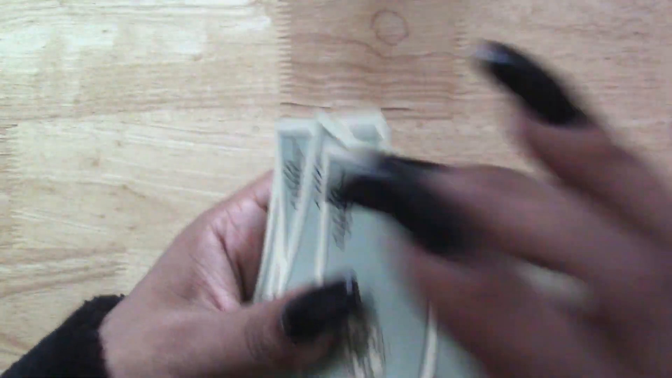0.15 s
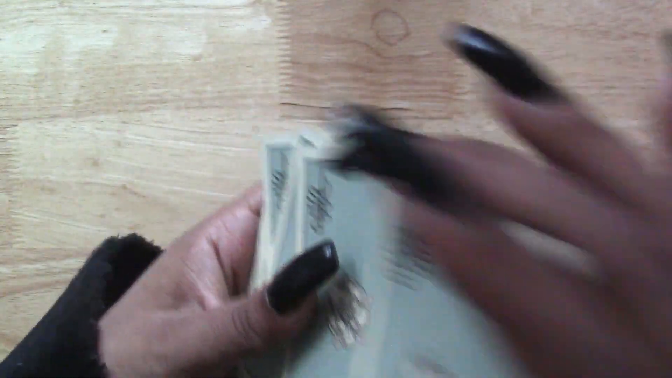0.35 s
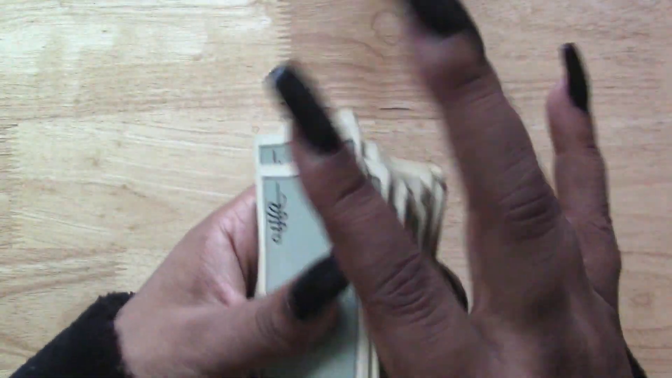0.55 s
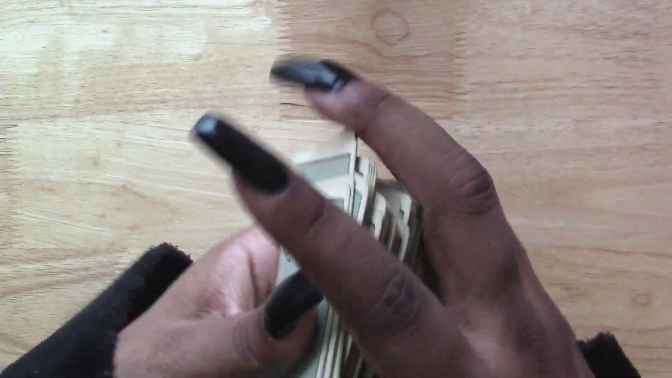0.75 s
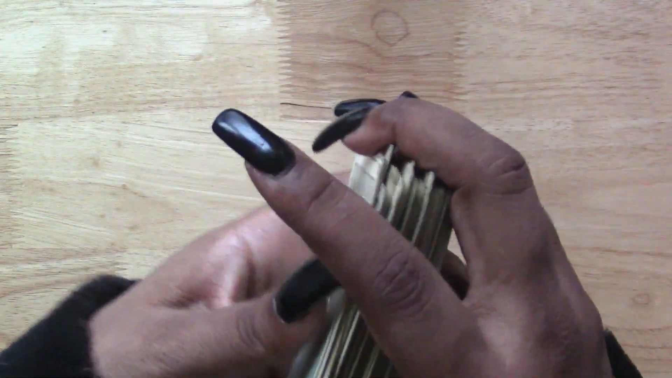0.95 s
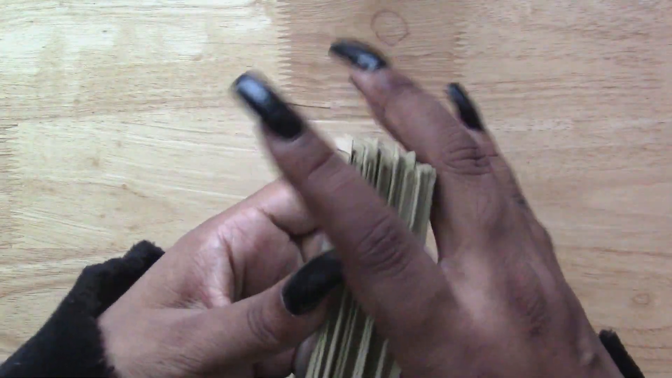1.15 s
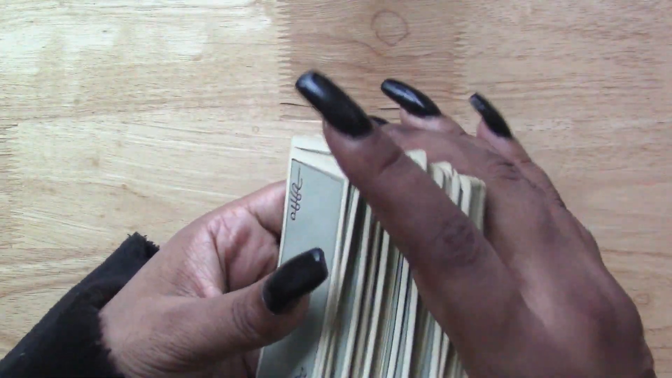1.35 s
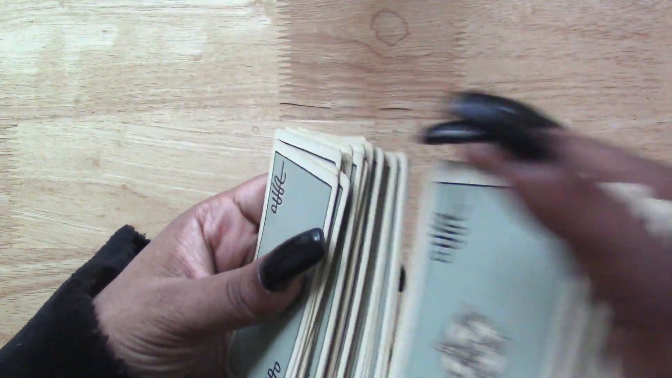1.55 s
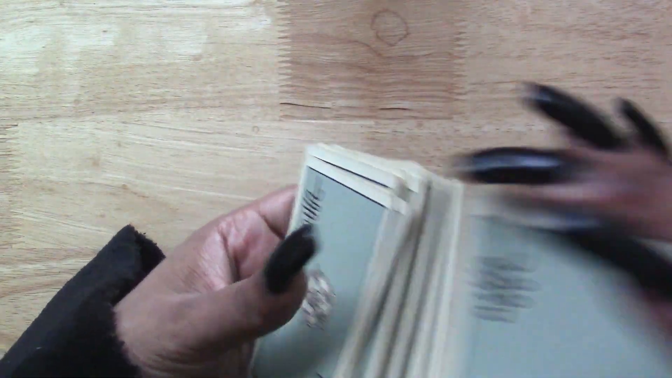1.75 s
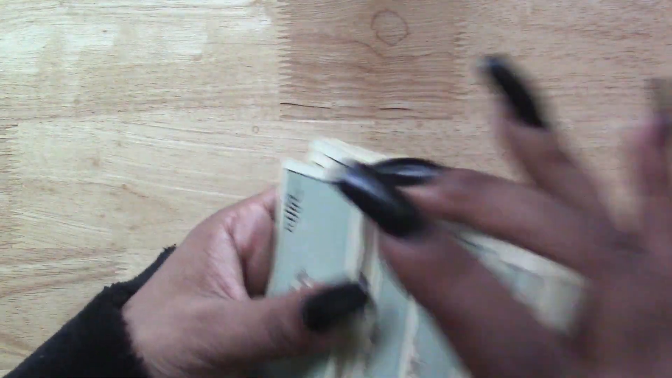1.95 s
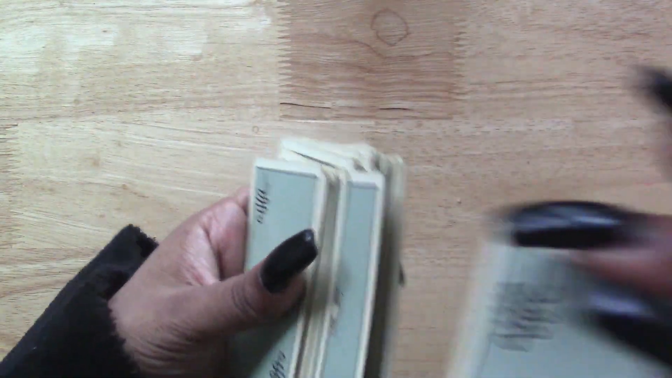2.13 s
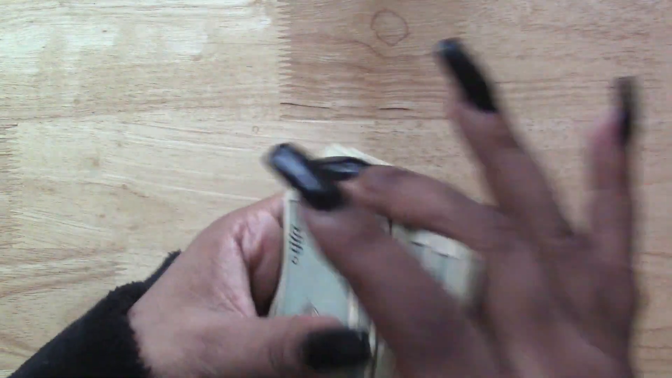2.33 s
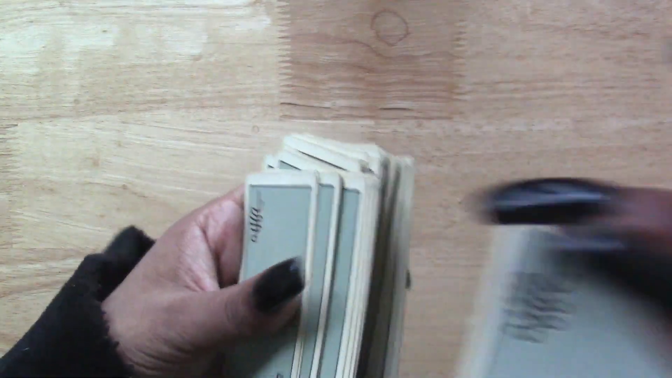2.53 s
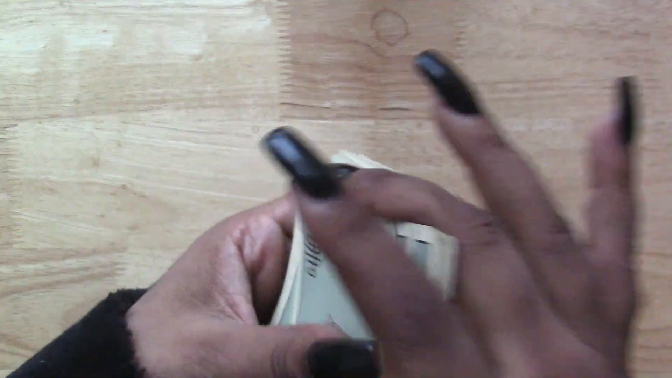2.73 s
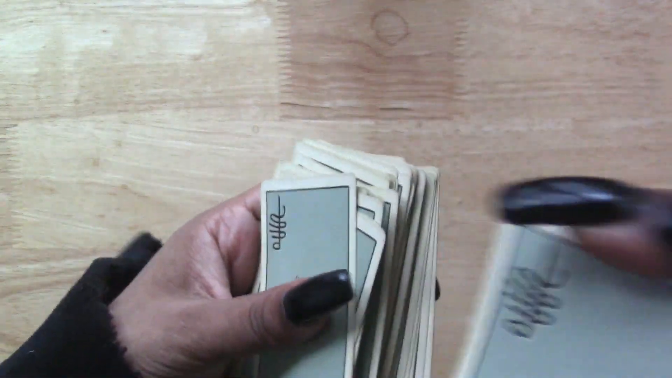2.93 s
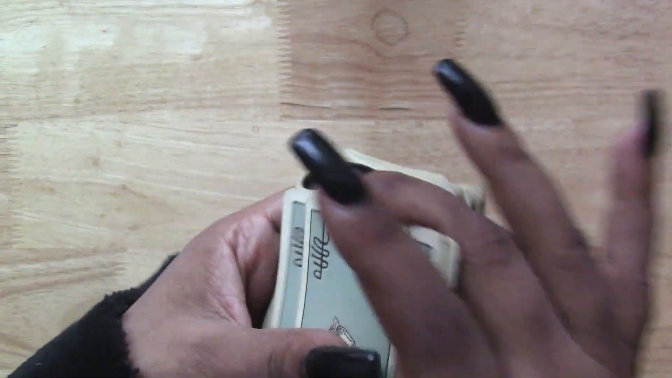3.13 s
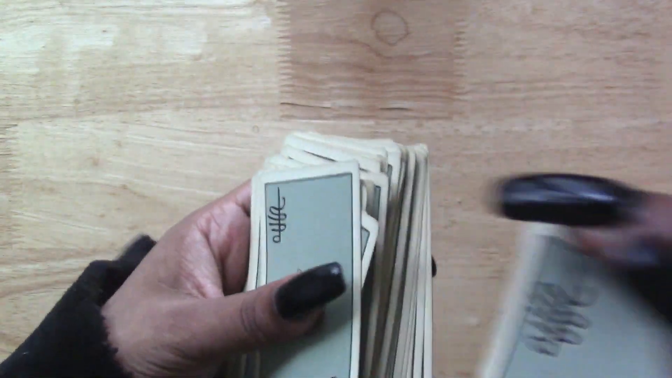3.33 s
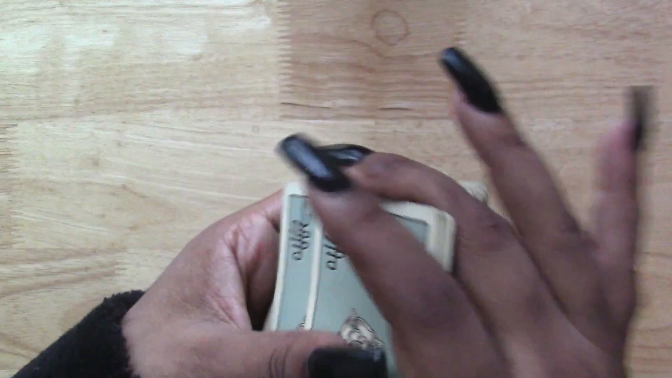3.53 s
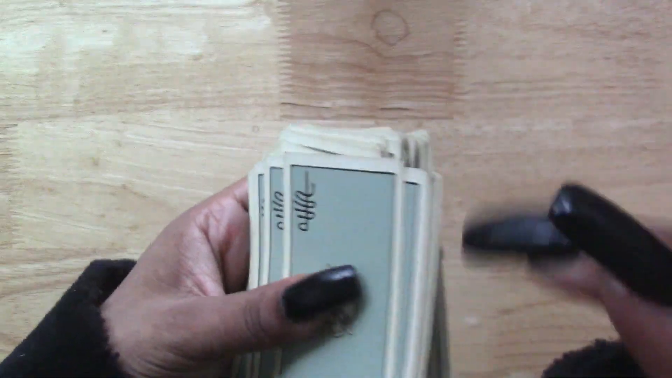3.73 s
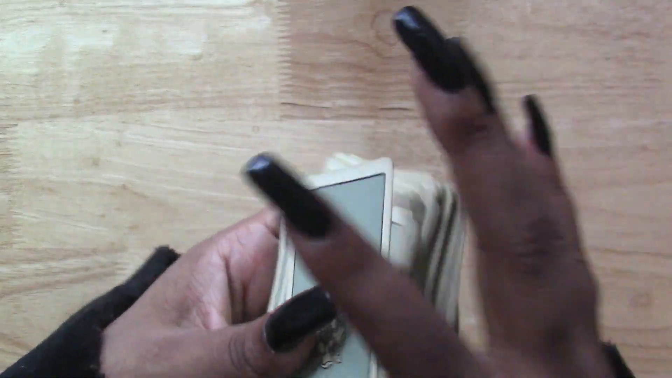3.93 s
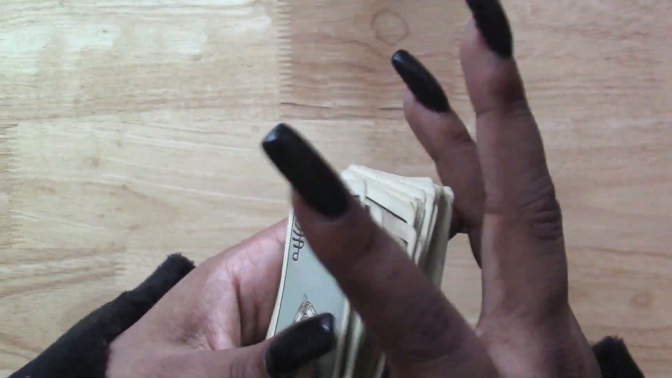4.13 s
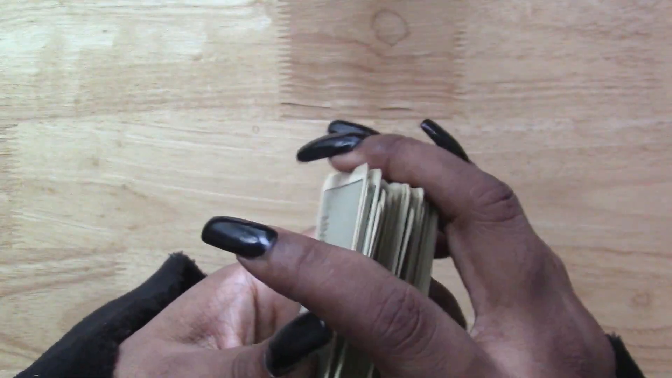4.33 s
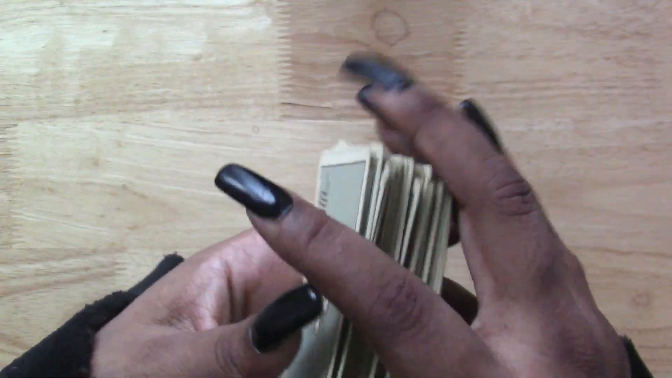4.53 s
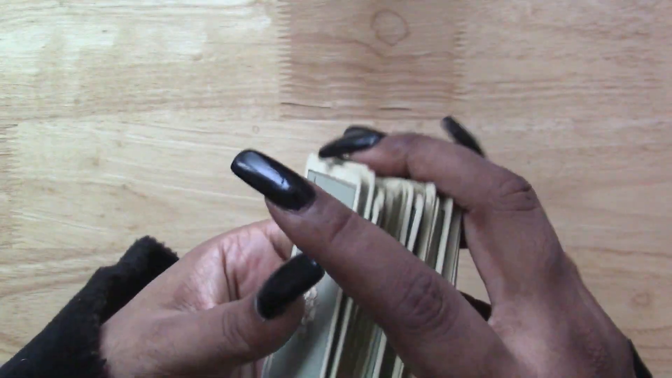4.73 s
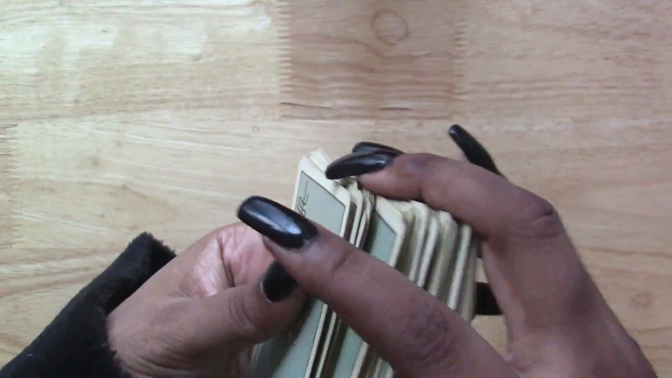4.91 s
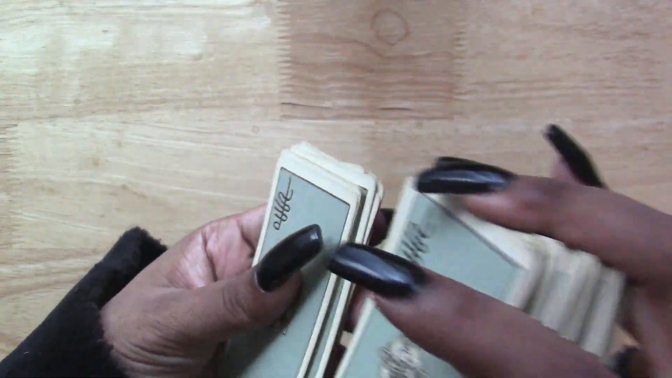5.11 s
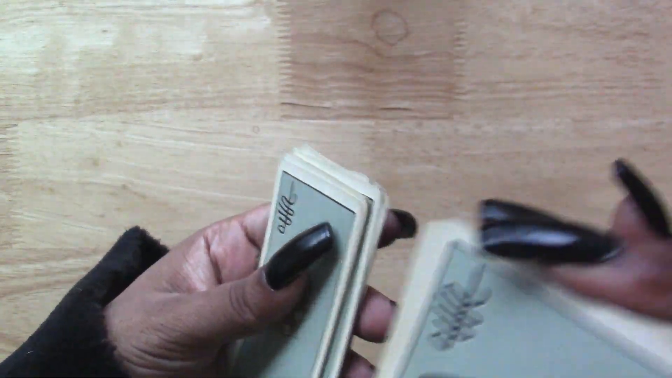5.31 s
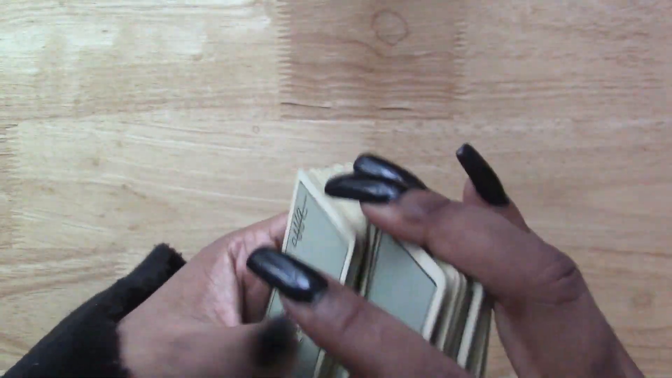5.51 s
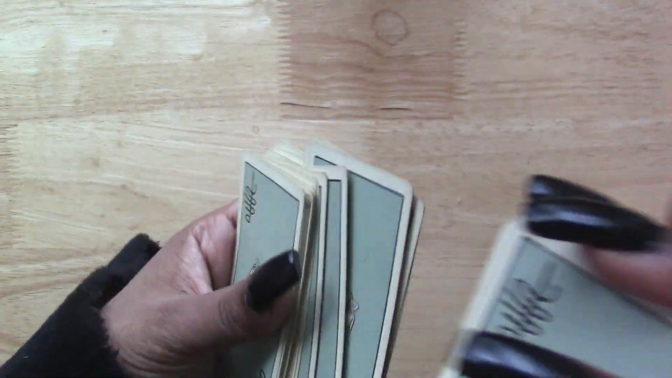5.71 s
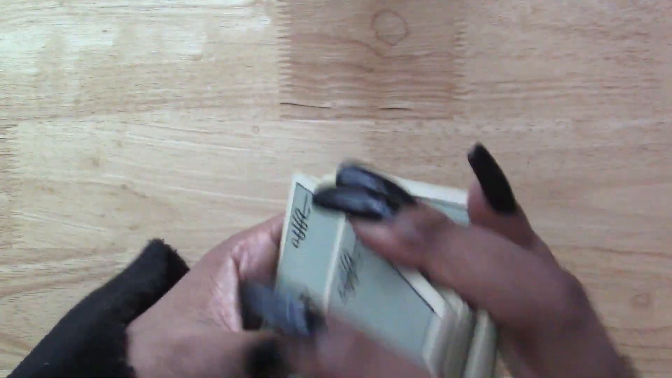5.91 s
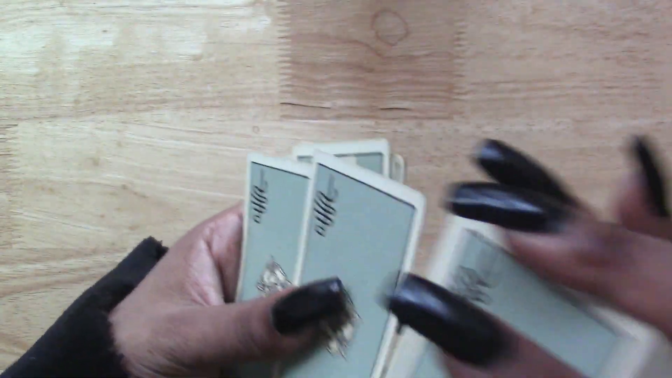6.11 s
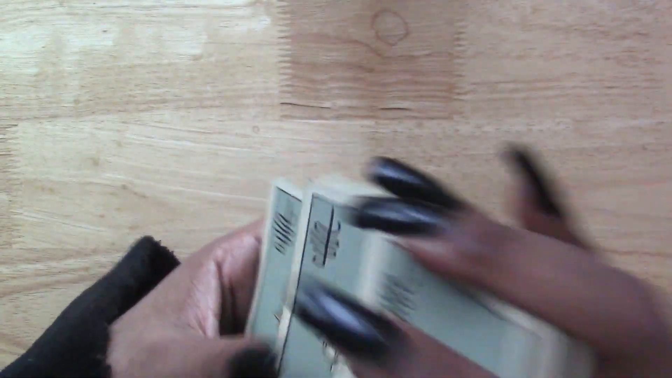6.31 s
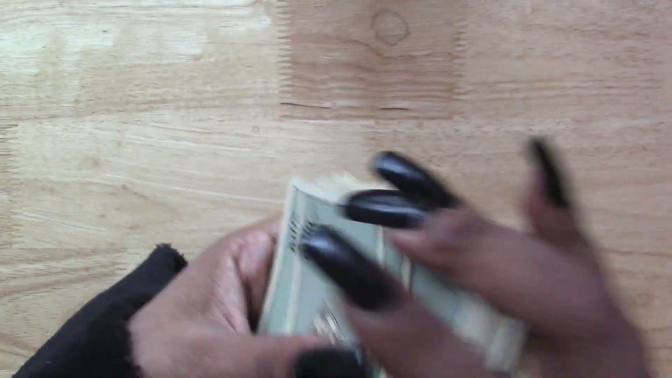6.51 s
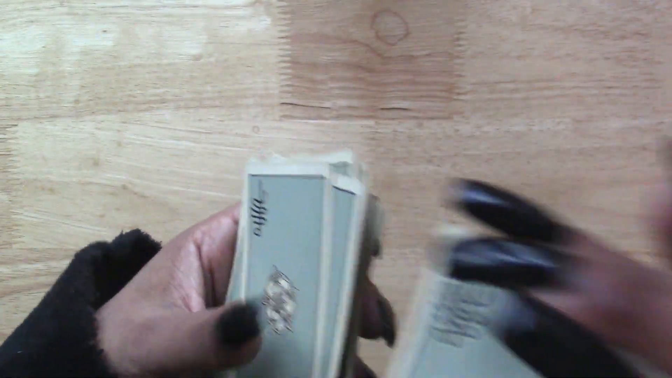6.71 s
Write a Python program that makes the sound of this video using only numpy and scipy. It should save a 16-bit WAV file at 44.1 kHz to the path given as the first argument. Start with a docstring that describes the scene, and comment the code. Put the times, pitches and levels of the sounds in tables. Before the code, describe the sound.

A deck of stiff cards is shuffled overhand close to the microphone, with papery hisses, crisp snaps, ticks and soft palm thuds in a quiet room.

```python
"""A soft bed of room air, then at once a papery rub, a clap and a burst of card ticks: a tarot deck is shuffled
overhand, close to the microphone, in a small quiet room. Each packet slides along the deck with a swelling
hiss and lands in a cluster of snaps and soft thuds; further claps, snaps and ticks fall in and between.
Filtered noise makes the air and the hiss; impulses ringing through resonators make snaps, knocks, thuds
and rasps."""
import sys
import numpy as np
from scipy import signal
from scipy.io import wavfile

SR = 44100
rng = np.random.default_rng(int(sys.argv[2]) if len(sys.argv) > 2 else 0)


def persist_wave(psi):
    """Save psi, clipped to +-1, as 16-bit WAV."""
    counts = np.round(np.clip(psi, -1, 1) * 32767).astype(np.int16)
    wavfile.write(sys.argv[1], SR, np.atleast_2d(counts).T)


N = 302526   # length in samples


def from_db(db):
    """Decibels to gain."""
    return 10 ** (np.asarray(db) / 20)


def rms_one(x):
    """Scale to unit power."""
    return x / np.sqrt(np.mean(x ** 2) + 1e-20)


def at_hz(points, hz):
    """Read a spectrum on a log-frequency axis."""
    points = np.array(points)
    return np.interp(np.log(hz), np.log(points[:, 0]), points[:, 1])


def cut(x, hz, kind, order=2):
    """Butterworth filter."""
    sos = signal.butter(order, np.clip(hz, 10, 0.45 * SR), kind, fs=SR, output="sos")
    return signal.sosfilt(sos, x)


def resonate(x, hz, width_hz):
    """A two-pole resonance with gain one at its top."""
    r = np.exp(-np.pi * width_hz / SR)
    zeros = np.array([1, 0, -1]) * (1 - r * r) / 2
    poles = [1, -2 * r * np.cos(2 * np.pi * hz / SR), r * r]
    return signal.lfilter(zeros, poles, x)


def flutter(per_s):
    """Random wandering with unit power, from per_s new values each second."""
    knots = rng.standard_normal(N // 8)
    return rms_one(np.interp(np.arange(N) * per_s / SR, np.arange(len(knots)), knots))


def bands(sources):
    """Third-octave bands (centre Hz, share of the spectrum, signal), neighbours fed by different sources."""
    edges = 16000 / 2 ** (np.arange(28, -1, -1) / 3)
    for k, (low, high) in enumerate(zip(edges, edges[1:])):
        band = cut(sources[k % 2], [low, high], "band", order=3)
        yield np.sqrt(low * high), 2 * (high - low) / SR, band


def with_energy(x, level_db):
    """Give a short sound the energy of 5 ms at that level."""
    return x * from_db(level_db) * np.sqrt(0.005 * SR / (np.sum(x ** 2) + 1e-20))


def stereo(mid, side, side_db):
    """Left and right from a shared and an opposed part."""
    return mid + from_db(side_db) * side * np.array([[1], [-1]])


def bump(t, middle_s, half_s):
    """A smooth bell-shaped rise and fall."""
    return np.exp(-0.5 * ((t - middle_s) / half_s) ** 2)


def rise_and_fade(t, peak_s, peak_db, rise_db_per_s, fade_db_per_s):
    """A gain that climbs to its peak and falls away, both straight lines in dB."""
    return from_db(peak_db - np.maximum((peak_s - t) * rise_db_per_s, (t - peak_s) * fade_db_per_s))


# colour of the room air: f/Hz, relative level per Hz/dB
AIR_COLOUR = [(25, -18), (45, -12), (80, -10.5), (125, 0), (240, 1.5), (350, -1.5), (500, -3), (800, -6.5),
              (1300, -7), (2100, -15.5), (3100, -15.5), (4500, -19.5), (6200, -22.5), (7500, -28),
              (12000, -32), (15000, -28)]
# stereo width of the room air: f/Hz, side minus mid level/dB
AIR_WIDTH = [(50, -4), (130, -8), (700, -4.5), (3000, -8), (12000, -15)]
# faint resonances in the room air, from narrow whirs to a broad hiss: f/Hz, width/Hz, level/dB
AIR_RESONANCES = [(1285, 9.7, -71.5), (3076, 78, -71.5), (5550, 83, -78.5), (6400, 1100, -72.5)]


def room_tone(air_db=-56.5):
    """Steady soft air noise, shaped band by band, with a few faint resonances of filtered noise."""
    air = 0
    for hz, _, (mid, side) in bands(rng.standard_normal((2, 2, N))):
        air = air + from_db(at_hz(AIR_COLOUR, hz)) * stereo(mid, side, at_hz(AIR_WIDTH, hz))
    resonances = sum(from_db(db) * rms_one(resonate(rng.standard_normal(N), hz, width))
                     for hz, width, db in AIR_RESONANCES)
    return from_db(air_db) * rms_one(air) + resonances


# colour of card rubbing on card: f/Hz, relative level per Hz/dB
RUB_COLOUR = [(100, -24), (250, -0.5), (650, -7.5), (850, -6), (1300, 0), (1650, -0.5), (2200, -3),
              (3300, 0.5), (4300, -4), (5400, -4.5), (6700, -9.5), (8800, -5), (11500, -9.5),
              (14500, -16.5)]


def sliding(friction_db, bright_db, catches_per_s=700, catch_db=-4, size_db=4, judder_db=2.5,
            judder_per_s=170, patchy_db=2.5, patchy_per_s=45, tilt_from_hz=1200, trim_db=-1.5):
    """Paper fibres hiss and catch; the stroke judders, and the colour shifts as the overlap changes."""
    sizes = from_db(size_db * np.minimum(rng.exponential(1, N), 4)) * rng.choice([-1, 1], N)
    catches = rms_one(sizes * (rng.random(N) < catches_per_s / SR))
    fibres = rms_one(rng.standard_normal((2, N)) + from_db(catch_db) * catches)
    hiss, power = 0, 0
    for hz, share, band in bands(fibres):
        if hz > RUB_COLOUR[0][0] / 2:
            tilt_db = bright_db * np.log2(max(hz / tilt_from_hz, 1))
            gain = from_db(at_hz(RUB_COLOUR, hz) + tilt_db)
            hiss = hiss + band * gain * from_db(patchy_db * flutter(patchy_per_s))
            power = power + share * gain ** 2
    return hiss / np.sqrt(power) * from_db(trim_db + friction_db + judder_db * flutter(judder_per_s))


# short rubs of card on card, some beside a snap or slap, levels before the trim:
# middle t/s, half length/s, friction level/dB, brightness/dB per octave
SHORT_RUBS = [(0.016, 0.0073, -46, 3), (0.093, 0.018, -44.5, -3), (0.502, 0.0058, -48.5, 3),
              (0.573, 0.014, -57.5, 3), (0.777, 0.016, -53, 2), (0.86, 0.021, -44, 5),
              (0.962, 0.017, -50, 2), (1.13, 0.044, -54, 2.5), (1.273, 0.033, -52.5, 1),
              (1.353, 0.06, -56.5, 1.5), (1.594, 0.019, -45.5, -3), (1.976, .012, -46.5, 0.5),
              (2.029, 0.01, -39.5, -0.5), (2.452, 0.0056, -35.5, 0), (4.012, 0.031, -45.5, 2),
              (4.148, 0.027, -60, 5), (4.337, 0.027, -47.5, 5.5), (4.395, 0.019, -52.5, 2.5),
              (5.035, 0.029, -59.5, -0.5), (5.117, 0.032, -51, -2), (5.559, 0.011, -39, -2),
              (5.649, 0.014, -37.5, -.5), (5.896, 0.015, -61.5, -1), (6.084, 0.01, -41, 0),
              (6.327, 0.0038, -47.5, 4), (6.616, 0.0064, -28.5, 1.5), (6.633, 0.026, -39.5, -3)]


def short_rubs(t):
    """Short rubs of card on card swell and fade smoothly: (gain, brightness) pairs."""
    return [(from_db(db) * bump(t, s, half), bright) for s, half, db, bright in SHORT_RUBS]


# what a struck card rings with, before random detuning: f/Hz, width/Hz, relative level/dB
CARD_MODES = [(1210, 320, -0.5), (1980, 1610, -2), (3316, 640, 5), (4980, 650, 1.5), (8080, 840, -6.5),
              (10300, 3000, -11)]


def contacts(rows, edge_share=0.38, edges_per_s=7000, detune=0.079, crack_trim_db=-14, crack_hz=4000,
             knock_width_hz=240, thud_hz=145, thud_width_hz=90, thud_db_per_octave=42, snap_trim_db=-1.68,
             thud_trim_db=-1, card_low_hz=850, knock_top_hz=800, thud_top_hz=280, size=4096):
    """One edge hits first, its neighbours patter after it; the packet knocks the deck and thuds in the palm."""
    out, t = np.zeros(N + size), np.arange(size) / SR
    for s, snap_db, bright_db, deck_db, knock_hz, palm_db, scatter_s in rows:
        edges = edge_share * rng.standard_normal(size) * (rng.random(size) < edges_per_s / SR) * 2
        edges *= np.exp(-t / max(scatter_s, 1e-4))
        edges[0] = 1

        # each contact shifts the ring pitches a little at random
        shift = np.exp(detune * rng.standard_normal(len(CARD_MODES)))
        tilt_db = np.clip(bright_db, -7, 7)
        ring = 0
        for k, (hz, width, db) in enumerate(CARD_MODES):
            mode_gain = from_db(db + tilt_db * np.log2(hz / CARD_MODES[2][0]))
            ring = ring + (-1) ** k * mode_gain * resonate(edges, hz * shift[k], width)
        snap = with_energy(cut(ring, card_low_hz, "high"), snap_db + snap_trim_db)
        # the bare impacts sound above the ring
        crack = with_energy(cut(edges, crack_hz, "high"), snap_db + crack_trim_db)

        knock = resonate(edges, knock_hz, knock_width_hz)
        knock = with_energy(cut(knock, knock_top_hz, "low"), deck_db)
        # the weaker the snap beside the thud, the deeper the thud
        palm_hz = thud_hz * 2 ** ((snap_db - palm_db) / thud_db_per_octave)
        thud = resonate(t == 0, palm_hz, thud_width_hz)
        thud = with_energy(cut(thud, thud_top_hz, "low"), palm_db + thud_trim_db)

        start = max(round(s * SR), 0)
        out[start:start + size] += snap + crack + knock + thud
    return out[:N]


TIGHT_KNOCK_HZ = 523   # pitch of the deck while it is held tight
# a stroke begins, levels before the trims: t/s, clap level/dB, clap brightness/dB per octave,
# deck knock level/dB, scatter of the edges/s, friction level/dB, friction brightness/dB per octave
PUSHES = [(0.0276, -40, -11, -51, 0.0025, -31.5, 3), (0.4596, -36, -2.5, -43, 0.0027, -40, 3),
          (1.9281, -36, -4, -42.5, 0.0059, -44, 2.5), (2.3376, -28.5, -3.5, -35.5, 0.0019, -42, .5),
          (2.718, -27, 0, -40, 0.0075, -42, 1.5), (3.1289, -27.5, -6, -34.5, 0.0022, -41, -1),
          (3.5296, -31, 6.5, -36, 0.0026, -38.5, -1), (5.5366, -36, -8, -45.5, 0.0028, -42, 1.5),
          (5.975, -30.5, -6, -45, 0.0028, -42, -1), (6.4047, -30, -4.5, -40, 0.0073, -37, 3)]


def push_rubs(t, lag_s=0.0045, rise_db_per_s=5000, fade_db_per_s=269, dulling_db_per_s=44):
    """The rub peaks just after the clap, then fades and dulls as it slows: (gain, brightness) pairs."""
    return [(rise_and_fade(t, s + lag_s, db, rise_db_per_s, fade_db_per_s), bright - dulling_db_per_s * (t - s))
            for s, *clap, db, bright in PUSHES]


def pushes(thud_db=-17.5):
    """The packet claps against the deck, with a palm thud set relative to the clap: rows of contacts."""
    return [(s, clap_db, bright, deck_db, TIGHT_KNOCK_HZ, clap_db + thud_db, scatter)
            for s, clap_db, bright, deck_db, scatter, *rub in PUSHES]


# further claps, snaps and ticks, some within a landing, one a loud slap, levels before the trims:
# t/s, snap level/dB, brightness/dB per octave, deck knock level/dB, scatter of the edges/s
SNAPS = [(0.0324, -24, -0.5, -66, 0.0037), (0.039, -23.5, 4.5, -43.5, 0.002),
         (0.0656, -42, -4, -42, 0.0013), (0.2527, -24.5, 0, -39, 0.00027), (0.2546, -35, -11, -29, 0.0016),
         (0.2646, -40, -2, -25.5, 0.0028), (1.5572, -42.5, 3, -47.5, .0006),
         (1.6002, -31, 3.5, -44.5, 0.0044), (1.6359, -40, -6, -48.5, 0.00072),
         (2.3797, -43.5, 4, -47, 0.0018), (2.4514, -26, -6, -51, .0015), (2.4864, -26.5, 5, -43, 0.00031),
         (2.8665, -32, 2, -38.5, 0.0015), (2.8928, -19, 1, -31, 0.002), (3.2687, -34, 2, -43, 0.0071),
         (3.2749, -28.5, -2, -49, 0.0034), (3.2868, -21.5, 7, -58, 0.0012),
         (3.6119, -47, -7, -48.5, 0.0021), (3.6943, -33, -5, -58, 0.002), (4.0019, -31.5, -4, -50, 0.0017),
         (5.1712, -42.5, -9.5, -53, .005), (5.554, -36.5, -3, -45, 0.00067),
         (5.6374, -35, -2, -39.5, 0.0029), (5.6541, -33, -2, -41, 0.0009), (5.7213, -29, 2.5, -43, 0.00031),
         (6.0136, -26.5, 4, -41.5, 0.0017), (6.0617, -41, 8, -53, 0.00066), (6.0785, -24, 1, -44, 0.0014),
         (6.0929, -33.5, 1, -45, 0.0046), (6.1756, -39, -1, -39, 0.0021), (6.1946, -34, 1, -34.5, 0.00085),
         (6.365, -40.5, 2, -43, 0.016), (6.4138, -28.5, 1.5, -39.5, 0.00082),
         (6.4767, -40.5, -11, -60, 0.0031), (6.605, -18, -5, -29.5, 0.0054),
         (6.639, -29.5, -1, -44, 0.00044), (6.647, -38, 1, -36, .0014)]


def snaps(ticks, thud_db=-23.5):
    """Further claps, snaps and ticks, one a loud slap; stray ticks join them: rows of contacts."""
    return [(s, snap_db, bright, deck_db, TIGHT_KNOCK_HZ, snap_db + thud_db, scatter)
            for s, snap_db, bright, deck_db, scatter in list(SNAPS) + ticks]


# edges rasp across the side of the deck: middle t/s, half length/s, rasp level/dB, cupped-hand hollow level/dB
RASPS = [(0.037, 0.0061, -24.5, -68), (0.85, 0.018, -54.5, -50), (0.963, 0.0089, -46, -59),
         (2.023, 0.014, -43.5, -51), (4.027, 0.0097, -46.5, -56), (4.343, 0.031, -54, -78),
         (5.715, 0.0097, -35.5, -44), (6.132, 0.0034, -37, -69), (6.159, 0.015, -38, -71),
         (6.611, .014, -33.5, -73)]
# what a rasped edge rings with: f/Hz, width/Hz, relative level/dB
EDGE_MODES = [(2770, 370, 8), (3860, 1800, 5.5), (5600, 1500, -3), (9000, 1300, -19)]


def rasps(slips_per_s=1500, size_db=2.0, hollow_hz=700, hollow_width_hz=150):
    """An edge sticks and slips over the stacked cards; every slip rings the edge and the hollow of the hand."""
    t = np.arange(N) / SR
    slips = (rng.random(N) < slips_per_s / SR) * from_db(size_db * rng.standard_normal(N))
    edge = rms_one(sum((-1) ** k * from_db(db) * resonate(slips, hz, width)
                       for k, (hz, width, db) in enumerate(EDGE_MODES)))
    hollow = rms_one(resonate(slips, hollow_hz, hollow_width_hz))
    return sum(bump(t, s, half) * (from_db(edge_db) * edge + from_db(hollow_db) * hollow)
               for s, half, edge_db, hollow_db in RASPS)


def stray_ticks(friction_db, ticks_per_s=12, tick_db=-3.5, spread_db=7.5, knock_db=-13, scatter_s=0.0008,
                count=400):
    """Ticks of stray edges at random moments, their level following the rubbing."""
    chance = rng.random((count, 2))
    times = np.cumsum(2 * chance[:, 0] / ticks_per_s)
    rub_db = np.interp(times * SR, np.arange(N), friction_db)
    levels = rub_db + tick_db + spread_db * (2 * chance[:, 1] - 1)
    return [(s, db, 0, db + knock_db, scatter_s) for s, db in zip(times, levels) if s * SR < N]


SETTLE_BRIGHTNESS = -4   # dull rustle and rebounds of dropped cards, dB per octave
# a stroke ends, levels before the trims: t/s, friction level/dB, swell/dB per s, friction brightness/dB per octave,
# snap level/dB, snap brightness/dB per octave, deck knock level/dB, knock f/Hz, palm thud level/dB,
# scatter of the edges/s
DROPS = [(0.261, -34.5, 148, 0.5, -22.5, -2, -36, 400, -29.5, 0.0011),
         (2.0808, -38, 159, -3, -28.5, -4.5, -26.5, 420, -38.5, 0.001),
         (2.489, -37.5, 154, 0.5, -20.5, -7.5, -38.5, 425, -42, 0.0015),
         (2.9003, -33.5, 156, 1, -18, -1, -28.5, 415, -42, 0.0019),
         (3.301, -32.5, 197, -.5, -21, 3, -29.5, 467, -38.5, 0.0026),
         (3.7048, -43.5, 120, 4, -59, 5, -38.5, 300, -40, 0.0024),
         (5.713, -39, 224, 3, -32, 10, -29.5, 507, -58, 0.0059),
         (6.2, -37, 102, -2, -37, -11, -30.5, 610, -32, 0.0026),
         (6.6004, -37, 215, 1.5, -20.5, -3, -30, 520, -51, 0.0015)]


def draw_rubs(t, release_db_per_s=1300, dulling_db_per_s=12.5, settle_db=-10.5, settle_fade_db_per_s=241):
    """A packet is drawn off ever faster, pressing harder and duller, then rustles as it settles."""
    rubs = []
    for s, db, swell, bright, *landing in DROPS:
        draw = rise_and_fade(t, s, db, swell, release_db_per_s)
        rubs.append((draw, bright - dulling_db_per_s * (t - s)))
        settle = rise_and_fade(t, s, db + settle_db, release_db_per_s, settle_fade_db_per_s)
        rubs.append((settle, SETTLE_BRIGHTNESS))
    return rubs


def drops():
    """The freed cards drop into the palm with snap, knock and thud: rows of contacts."""
    return [(s, *landing) for s, db, swell, bright, *landing in DROPS]


def rocking(interval_s=0.011, first_db=-15, loss_db=4, knock_db=5, snap_db=1, loose_knock_hz=328, count=3):
    """The loose packet rocks in the palm: uneven, weakening, deeper-knocking rebounds as rows of contacts."""
    rows = []
    for s, *earlier, palm_db, scatter in DROPS:
        for k in range(count):
            thud_db = palm_db + first_db - loss_db * k
            when = s + interval_s * (k + rng.uniform(0.64, 1.3))
            rows.append((when, thud_db + snap_db, SETTLE_BRIGHTNESS, thud_db + knock_db, loose_knock_hz,
                         thud_db, scatter))
    return rows


def friction(resting_db=-66, resting_brightness=-1):
    """Level (dB) and brightness (dB per octave) of all rubbing; the held deck is never quite still."""
    t = np.arange(0, N, 20) / SR
    moves = [(from_db(resting_db), resting_brightness)] + short_rubs(t) + push_rubs(t) + draw_rubs(t)
    power = sum(gain ** 2 for gain, bright in moves)
    brightness = sum(gain ** 2 * bright for gain, bright in moves) / power
    every_sample = np.arange(N) / SR
    return np.interp(every_sample, t, 10 * np.log10(power)), np.interp(every_sample, t, brightness)


def room(x, t60=0.31, treble_t60=0.31, wet_db=-16, treble_db=-23, split_hz=4500, sheen_hz=6500,
         sheen_width_hz=900, sheen_db=4, first_wall_s=0.0043, size=22050):
    """Dense decaying wall reflections with a narrow treble sheen, partly different on each side."""
    t = np.arange(size) / SR
    noise = rng.standard_normal((2, size)) * np.clip(t / first_wall_s - 1, 0, 1)
    tail = 0
    for kind, decay, db in (("low", t60, wet_db), ("high", treble_t60, treble_db)):
        fade = np.exp(-np.log(1000) * t / decay)
        tail = tail + from_db(db) * cut(noise, split_hz, kind) * fade / np.sqrt(np.sum(fade ** 2))
    tail = tail + from_db(sheen_db) * resonate(tail, sheen_hz, sheen_width_hz)
    mid, side = signal.fftconvolve(x[None], tail, axes=1)[:, :N]
    return stereo(mid, side, side_db=-15)


def scene(lean_db=-19, lean_hz=1400, treble_lean_db=-14, small_source_hz=88):
    """Cards are too small to radiate deep bass; they lean a little to the right, most of all in the lows."""
    friction_db, bright_db = friction()
    blows = pushes() + snaps(stray_ticks(friction_db)) + drops() + rocking()
    cards = sliding(friction_db, bright_db) + contacts(blows) + rasps()
    cards = cut(cards, small_source_hz, "high")
    lean = cut(cards, lean_hz, "low", order=1) + from_db(treble_lean_db) * cards
    return room_tone() + stereo(cards, -lean, lean_db) + room(cards)


def record(dry, rumble_hz=30, top_hz=14000, cutoff_hz=15700):
    """The small microphone loses the deep bass and the highest treble; the top is cut steeply."""
    heard = cut(dry, rumble_hz, "high", order=1)
    heard = cut(heard, top_hz, "low", order=4)
    return signal.sosfilt(signal.ellip(10, 0.1, 80, cutoff_hz, fs=SR, output="sos"), heard)


dry = scene()
out = record(dry)
persist_wave(out)
```